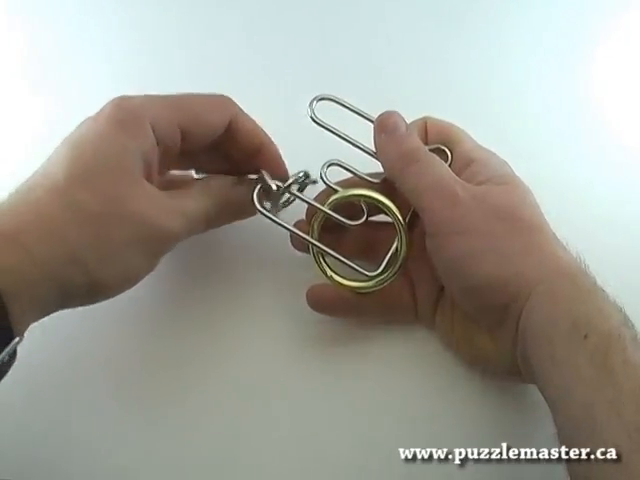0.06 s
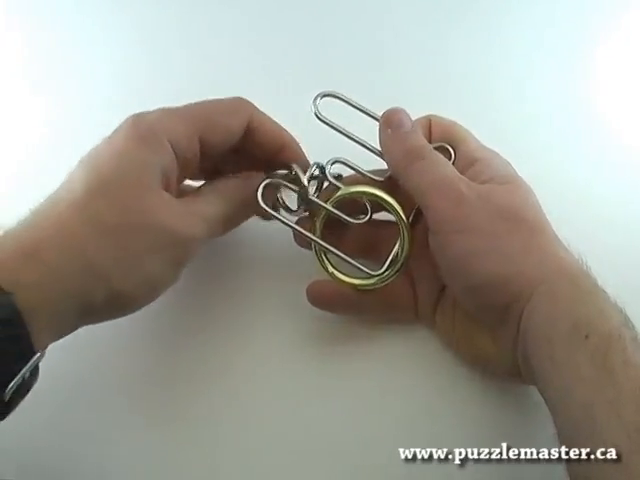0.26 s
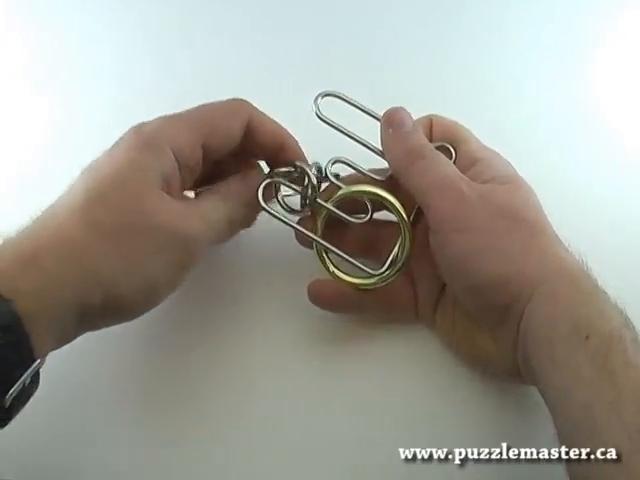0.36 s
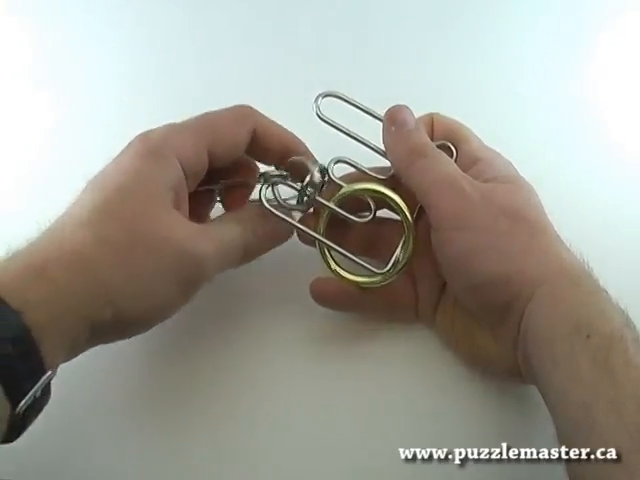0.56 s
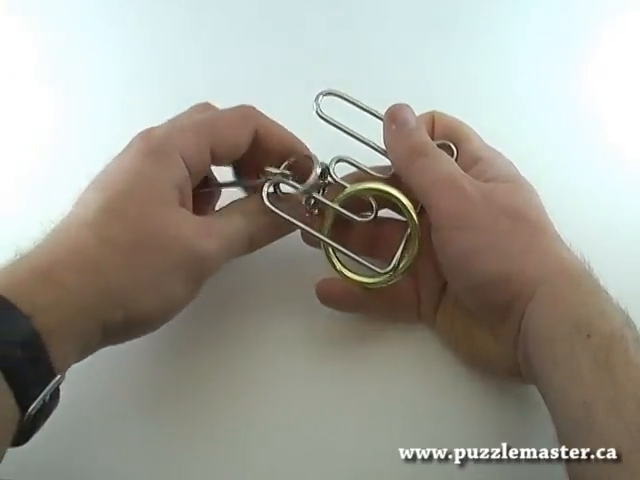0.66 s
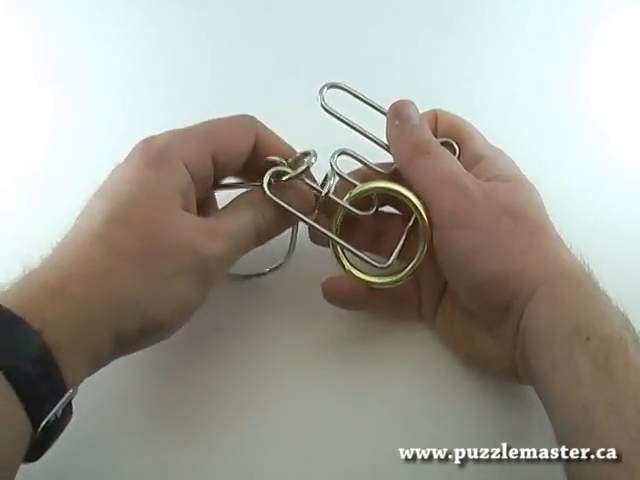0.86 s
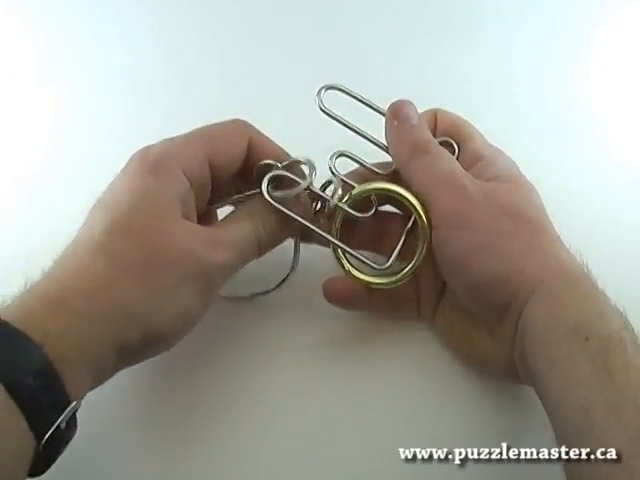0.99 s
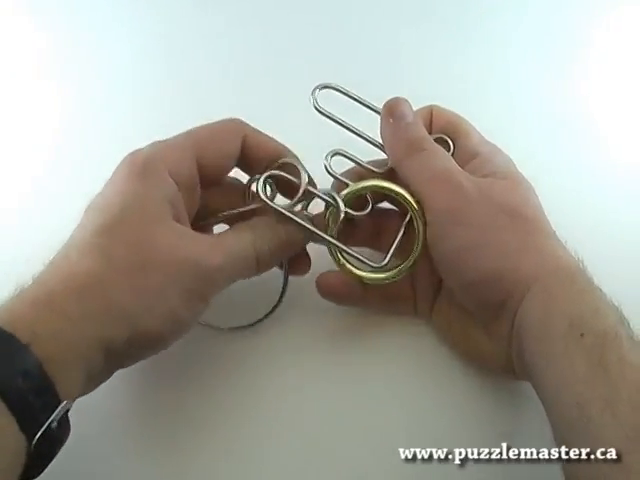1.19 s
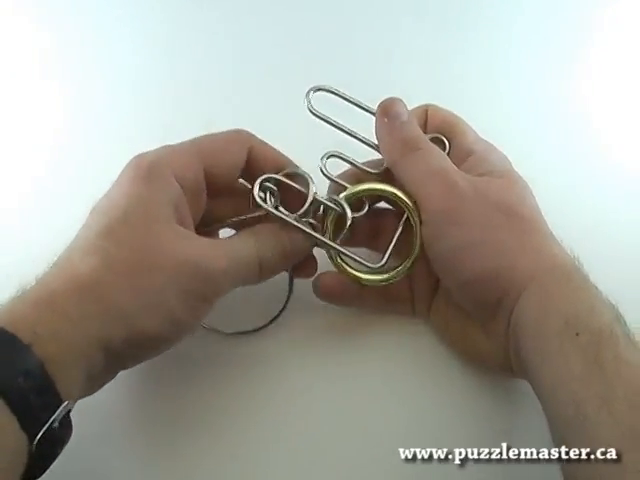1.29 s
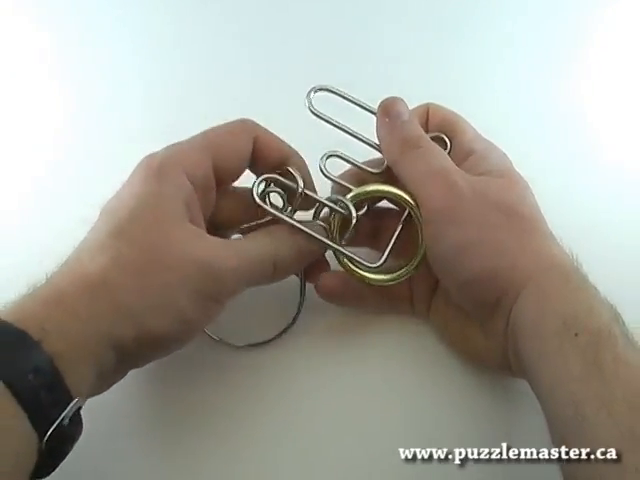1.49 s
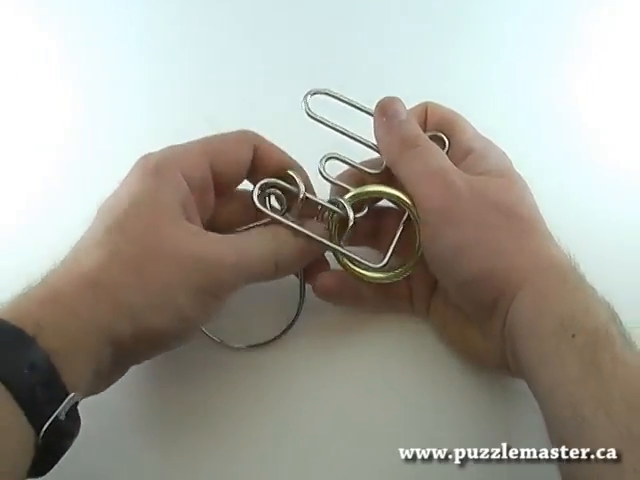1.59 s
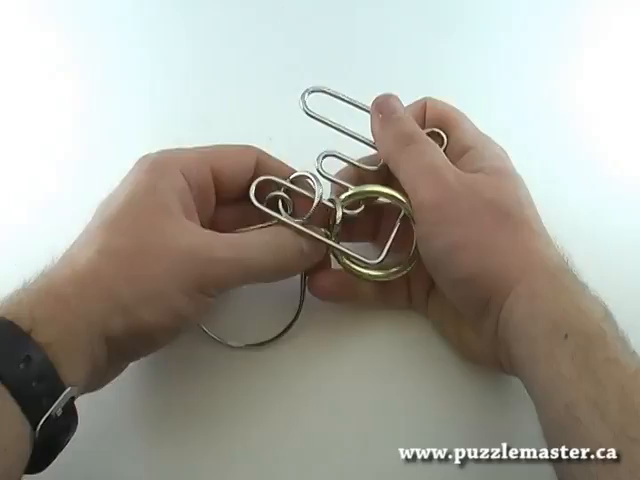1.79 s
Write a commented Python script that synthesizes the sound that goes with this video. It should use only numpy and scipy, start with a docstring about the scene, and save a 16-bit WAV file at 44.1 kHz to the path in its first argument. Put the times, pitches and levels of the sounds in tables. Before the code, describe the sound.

Steel wire puzzle pieces clink in two hands, close and bright, with short choked rings. Light clinks scatter from 0 to 0.4 s; the sharpest burst comes at 0.52 s with a soft low knock, more hits follow to 0.73 s. A faint scrape near 0.9 s leads to a chattering cluster at 1.1-1.35 s, then weaker clinks around 1.54 s and sparse faint taps. Quiet room hiss and hum continue.

```python
"""Bright metal clinks and chatters in a quiet, humming room: two hands work a steel wire puzzle.
Each clink is a sharp snap, a grainy rattle of small hits and a ring of decaying sine waves.
Ticks are short clicks of noise; thumps are low decaying sine waves in the table, under a dull click.
Wire sliding on wire is grainy noise with a low drag. Filtered noise and hum fill the background."""
import sys
import numpy as np
from scipy import signal
from scipy.fft import rfft, irfft
from scipy.io import wavfile
from scipy.ndimage import uniform_filter1d

SR = 44100
rng = np.random.default_rng(int(sys.argv[2]) if len(sys.argv) > 2 else 0)


def to_wav(s):
    """Save 16-bit WAV."""
    ch = np.atleast_2d(s).T  # columns
    pcm = np.round(np.clip(ch, -1, 1) * 32767)  # PCM
    wavfile.write(sys.argv[1], SR, pcm.astype(np.int16))


N = 81585  # length of the scene in samples

# Low resonances of the table: f/Hz, width/Hz (wider dies faster), level/dB against each other
TABLE_MODES = [(195, 39, -2), (238, 28.5, -8), (332.5, 49, -4), (396.7, 49, -1.5), (1019, 28, -9.5),
               (1378, 110, -9.5), (1714, 173, -5.5)]


def amp(db):
    """Turns decibels into a plain multiplier."""
    return 10 ** (np.asarray(db) / 20)


def evened(x):
    """Scales x to an rms of 1."""
    return x / np.sqrt(np.mean(x ** 2) + 1e-20)


def read(points, hz):
    """Reads a curve of (f/Hz, value) points, joined by straight lines over log frequency."""
    f, value = np.transpose(points)
    return np.interp(np.log(hz + 1), np.log(f + 1), value)


def add(mix, s, sound):
    """Adds a sound to the mix from second s on, cut off where the mix ends."""
    part = mix[:, round(s * SR):][:, :sound.shape[-1]]
    part += sound[..., :part.shape[1]]


def coloured(x, points, tilt_db=0., pivot_hz=9000, from_hz=4500):
    """Gives x a spectrum, tilted in dB per octave about a pivot; the tilt stays level below from_hz."""
    hz = np.fft.rfftfreq(x.shape[-1], 1 / SR)
    octaves = np.log2(np.maximum(hz, from_hz) / pivot_hz)
    return irfft(rfft(x) * amp(read(points, hz) + tilt_db * octaves), x.shape[-1])


def whistle(hz, width):
    """Noise in one narrow resonance, rms 1: it sounds like a wavering tone."""
    r = np.exp(-np.pi * width / SR)
    turn = np.exp(2j * np.pi * hz * np.arange(N) / SR)
    slow = signal.lfilter([1], [1, -r], rng.standard_normal(N) / turn)
    return evened((turn * slow).real)


def level(curve):
    """Turns (t/s, level/dB) points into a volume curve, practically silent outside them."""
    s, db = np.transpose(curve)
    return amp(np.interp(np.arange(N) / SR, s, db, -140, -140))


def wire_ring(t, hz, mode_db, near, t60, tilt_db, chatter, free_s):
    """The wire's modes ring as decaying sines; the two favoured pitches are strongest and last longest."""
    focus_db, scatter_db, flutter_db, detune = 20, 2.5, 1, 0.0012
    early_db, early_s = 9.5, 0.0042  # the ring starts louder until the fingers close
    choke_db_per_s, escapes = 782.5, 0.65  # share of the choke that the favoured modes escape
    others_last = 0.6  # share of t60 that modes far from the favoured pitches last
    luck = rng.standard_normal((3, len(hz), 1))
    start_db = mode_db + focus_db * near + scatter_db * luck[1] + tilt_db * np.log2(hz / 9000)
    lasts = t60 * (others_last + (1 - others_last) * near)
    turns = hz * (1 + detune * luck[0]) * t + luck[2]
    flutter = evened(uniform_filter1d(rng.standard_normal((len(hz), len(t))), 150))
    mode_level = start_db + flutter_db * flutter + early_db * np.exp(-t / early_s) - 60 * t / lasts
    choke = choke_db_per_s * (1 - escapes * near) * np.maximum(t - free_s, 0)
    ring = (amp(mode_level - choke) * np.sin(2 * np.pi * turns)).sum(0)
    ring *= 1 - np.exp(-t / (0.47 * chatter))  # longer chatter gives a softer start
    return ring / np.std(ring[:300])


def wire_rattle(t, hz, mode_db, near, t60, tilt_db, chatter, free_s):
    """Many small hits each start a grain of noise, tuned to the wire and partly different left and right."""
    # Spectrum of one grain before tuning: f/Hz, relative level/dB
    crack = [(900, -55), (2000, -32), (3200, -23), (4000, -29.5), (4700, -17.5), (6200, -6.5), (7400, -9.5),
             (8200, -4.5), (11500, -1), (14700, -9), (16500, -7)]
    # Strength of the left-right difference: f/Hz, share of the common noise
    wide = [(3000, 0.036), (8000, 0.11), (13000, 0.75)]
    contacts_per_s, first_contact, shorter = 1100, 1.55, 0.71  # shorter: share of the ring's t60
    tuned_db, tuned_width_hz, grain_t60, choke_db_per_s = -0.5, 55, 0.034, 782.5
    sizes = rng.uniform(-1, 1, len(t))
    hits = sizes * (rng.random(len(t)) < contacts_per_s / SR)
    hits[0] = first_contact
    fade_db = -60 * np.maximum(t - chatter, 0) / (t60 * shorter)
    hits *= amp(fade_db - choke_db_per_s * np.maximum(t - free_s, 0))
    noise = coloured(rng.standard_normal((2, 2048)), crack, tilt_db)
    bins = np.fft.rfftfreq(2048, 1 / SR)
    tuned = amp(tuned_db + mode_db + 0.17 * 20 * near) / (1 + ((bins - hz) / tuned_width_hz) ** 2)
    noise = irfft(rfft(noise) * (1 + tuned.sum(0)) * np.array([bins ** 0, read(wide, bins)]))
    grain = noise * amp(-60 * t[:2048] / grain_t60) * np.minimum(t[:2048] / 0.00034, 1)
    both, apart = signal.fftconvolve(grain, hits[None], axes=1)[:, :len(t)]
    return (both + np.array([[1], [-1]]) * apart) / np.sqrt(np.mean(both[:300] ** 2))


def clink(s, db, low_hz, high_hz, t60, tilt_db, chatter, rattle_db, free_s):
    """A contact snaps, rattles and rings the wire; the next contact, free_s later, chokes ring and rattle."""
    # Resonances of the wire: f/Hz, level/dB against each other
    wire = [(5040, -11.5), (6070, -21.5), (6290, -5.5), (6500, -8), (7040, -11.5), (7950, -7.5),
            (8370, -6.5), (8800, -14.5), (9740, -3.5), (10250, -13.5), (10620, -12), (10900, -10),
            (11210, -1.5), (11380, -0.5), (11960, -5.5), (12600, 0), (13000, 0.5), (14260, -8)]
    clink_db, focus_octaves, snap_db, snap_t60 = -14.5, 0.065, 9.5, 0.003
    t, t60 = np.arange(6000) / SR, max(t60, .01)
    hz, mode_db = np.transpose(wire)[:, :, None]
    # 1 for modes at the two favoured pitches, falling to 0 away from them
    near = sum(np.exp(-.5 * (np.log2(hz / f) / focus_octaves) ** 2) for f in (low_hz, high_hz)).clip(0, 1)
    contact = (t, hz, mode_db, near, t60, tilt_db, chatter, free_s)
    ring = wire_ring(*contact)
    rattle = wire_rattle(*contact)
    snap_band = signal.butter(3, [5500, 13500], "band", fs=SR, output="sos")
    crackle = rng.choice([-1., 1.], len(t)) * amp(snap_db - 60 * t / snap_t60)
    snap = signal.sosfilt(snap_band, crackle)
    return s, amp(db + clink_db) * (ring + amp(rattle_db) * rattle + snap)


def tick(s, db, tilt_db):
    """A damped wire taps without ringing: a short burst of noise over a wide range of pitches."""
    t = np.arange(2048) / SR
    colour = [(300, -31), (1000, -5.0), (9000, 9), (15000, -5)]  # f/Hz, relative level/dB
    noise = coloured(rng.standard_normal(len(t)), colour, tilt_db, 3000, 960)
    return s, amp(db - 6.5 - 60 * t / 0.019) * evened(noise) * np.minimum(t / 0.0012, 1)


def thump(s, db, t60, tilt_db, focus_hz):
    """A knock reaches the table, whose low modes swell in a few ms and die away, under a dull click."""
    scatter_db, focus_db, detune = 2, 9.5, 0.064
    t = np.arange(8000) / SR
    hz, width, mode_db = np.transpose(TABLE_MODES)[:, :, None]
    start_db = mode_db + tilt_db * np.log2(hz / 300) + scatter_db * rng.standard_normal(hz.shape)
    start_db = start_db + focus_db * np.exp(-.5 * (np.log2(hz / focus_hz) / 0.24) ** 2)
    fade = amp(start_db - 60 * t * (.5 / t60 + 0.28 * width / 2.37))
    fade = fade * (1 - np.exp(-t * hz / 1.62))  # higher modes swell sooner
    mode_hz = hz * (1 + detune * rng.uniform(-0.84, 1, hz.shape))
    ring = (fade * np.sin(2 * np.pi * mode_hz * t)).sum(0)
    # f/Hz, relative level/dB
    colour = [(60, -21), (200, -3.5), (500, -7.5), (2000, -6), (4000, -11), (9000, -33)]
    click = evened(coloured(rng.standard_normal(len(t)), colour, tilt_db, 300, 150))
    click *= amp(-3.0 - 60 * t / (1.34 * t60))
    return s, amp(db - 13.5) * (ring + click)


def slides():
    """Wire rubs on wire: noise of uneven loudness makes a grainy hiss, with a low drag in the table."""
    # Loudness of each rub, one list per rub: t/s, level/dB
    rubs = [
        [(.84, -77), (.87, -60), (.9, -61), (.925, -56), (.947, -62.5)],
        [(1.49, -74), (1.512, -56.5), (1.524, -65.5), (1.54, -63), (1.546, -42.5)],
        [(.505, -71), (.515, -55), (.522, -42)],
    ]
    # Spectrum of the hiss: f/Hz, relative level/dB
    hiss_colour = [(470, -25), (1440, -5.5), (2840, -23), (4080, -5.5), (4510, -4.5), (7080, -1.5),
                   (10600, -7), (16000, -23)]
    # Loudness of the drag felt in the table: t/s, level/dB
    drag_level = [(.78, -78), (.82, -66.5), (.87, -56.5), (.91, -61), (.96, -70)]
    noise = rng.standard_normal(N)
    uneven_db = evened(uniform_filter1d(rng.standard_normal(N), 60))
    hiss = evened(coloured(noise * amp(uneven_db), hiss_colour)) * sum(level(rub) for rub in rubs)
    drag = evened(sum(amp(db) * whistle(hz, width) for hz, width, db in TABLE_MODES))
    return hiss + drag * level(drag_level)


def ports(x):
    """Two close microphone ports hear small differences in phase and balance, which vary with pitch."""
    # Phase by which the left leads: f/Hz, lead/rad
    lead = [(0, 0.82), (10200, -0.14), (12700, 1), (14800, 0.48)]
    # Balance, left against right: f/Hz, level/dB
    lean = [(3000, -1.4), (8000, 0.5), (13000, 1.5)]
    hz = np.fft.rfftfreq(N, 1 / SR)
    half = amp(.5 * read(lean, hz)) * np.exp(.5j * read(lead, hz))
    return irfft(rfft(x) * np.array([half, 1 / half]), N)


def room(x):
    """Short sparse reflections from table and hands, different in each channel."""
    room_t60 = 0.27  # seconds to fall by 60 dB; the reflections stop before that
    t = np.arange(5000) / SR
    signs = rng.choice([-1., 1.], (2, len(t)))
    taps = signs * (rng.random((2, len(t))) < .05) * amp(-60 * t / room_t60)
    taps = taps / np.linalg.norm(taps, axis=1)[:, None]
    return signal.fftconvolve(x, taps, axes=1)[:, :N]


def air():
    """Room and preamp noise, partly shared by the channels, with wavering hum lines and one steady hum."""
    # Spectrum of the noise: f/Hz, relative level/dB
    air_colour = [(12, -53), (20, -2.5), (258, -2.5), (566, -6.5), (749, -4.5), (1690, -8.5), (1840, -13),
                  (2300, -10), (3710, -17), (5660, -12), (6890, -12.5), (10500, -15), (14700, -18),
                  (16500, -29)]
    # Left-right likeness of the noise: f/Hz, likeness (1 = identical, 0 = unrelated)
    air_same = [(40, 0.71), (240, 0.61), (700, 0.61), (3770, 0.69), (15000, 0.073)]
    # Wavering hum lines: f/Hz, width/Hz, level/dB
    hum_lines = [(121.6, 17, -74), (236.5, 5.5, -75), (2272, 8.3, -80.5), (747, 41, -78)]
    air_db, steady_hz, steady_db = -64.5, 242.3, -71
    hz = np.fft.rfftfreq(N, 1 / SR)
    a, b = rfft(rng.standard_normal((2, N)))
    same = read(air_same, hz)
    pair = np.array([a, same * a + np.sqrt(1 - same ** 2) * b])
    wash = irfft(pair * amp(read(air_colour, hz)), N)
    wavering = sum(amp(db) * whistle(f, width) for f, width, db in hum_lines)
    steady = amp(steady_db) * np.sin(2 * np.pi * steady_hz * np.arange(N) / SR)
    return amp(air_db) * evened(wash) + wavering + steady


def scene():
    """Places every clink, tick and thump, then adds the reflections, slides and background."""
    # Wire contacts: t/s, level/dB (before a common trim), low favoured f/Hz, high favoured f/Hz,
    # ring t60/s when not choked, tilt/(dB per octave), chatter/s, rattle level against ring/dB
    clinks = sorted([(0.0374, -37.5, 9190, 12800, 0.12, -27, 0.023, 1),
                     (0.0483, -25, 5330, 10110, 0.023, -1, 0.014, -4),
                     (0.0902, -43.5, 7950, 9000, 0.06, -11, 0.0087, -1.5),
                     (0.1496, -26.5, 8300, 11100, 0.04, -5.5, 0.0074, 3),
                     (0.2044, -29, 5830, 14100, 0.24, -8, 0.0082, 6.5),
                     (0.3227, -28.5, 9000, 10500, 0.048, -1.5, 0.0012, 7.5),
                     (0.5284, -16.5, 8200, 11030, 0.23, -1, 0.016, 2),
                     (0.5414, -25, 8300, 14260, 0.096, 2, 0.0047, -23),
                     (0.5624, -25.5, 9120, 11400, 0.25, -2.5, 0.0026, 7),
                     (0.5744, -26, 8650, 14300, 0.038, 13, 0.0071, 4),
                     (0.5874, -33, 5950, 9900, 0.054, -11, 0.0026, 5.5),
                     (0.6024, -36, 6180, 10800, 0.031, 3, 0.0029, 4),
                     (0.6814, -19.5, 8210, 12800, 0.056, 0.5, 0.002, 1.5),
                     (0.7282, -35.5, 6060, 11420, 0.052, -6.5, 0.0016, 0),
                     (0.9158, -46, 7900, 10600, 0.06, -11, 0.0025, 5),
                     (1.1009, -25.5, 7000, 10800, 0.026, -3.5, 0.002, 3.5),
                     (1.1574, -29, 6100, 7840, 0.069, -17, 0.0029, -3),
                     (1.1844, -43, 8300, 10600, 0.053, -11, 0.0034, 1),
                     (1.2004, -42.5, 6200, 9750, 0.03, -20, 0.003, -6),
                     (1.2241, -46, 6140, 10200, 0.051, -15, 0.0054, 1.5),
                     (1.3947, -38.5, 8530, 13000, 0.091, -9, 0.0016, 6),
                     (1.5244, -35, 6400, 9400, 0.1, -2, 0.0039, 3),
                     (1.5419, -24, 8000, 11100, 0.028, -1.5, 0.0017, 7),
                     (1.5584, -39, 8120, 11800, 0.035, -3, 0.0032, 8),
                     (1.5764, -42.5, 8700, 10000, 0.022, -7, 0.0023, 9.5),
                     (1.6407, -38, 7100, 14260, 0.027, -2.5, 0.0044, 1.5),
                     (1.715, -46, 8800, 9350, 0.032, -21, 0.0038, -2),
                     (1.7943, -41.5, 7020, 10900, 0.0097, -16.5, 0.00082, 9),
                     (1.139, -25.5, 6200, 11300, 0.097, 6, 0.012, -12),
                     (1.2815, -32, 11380, 14260, 0.11, 5, 0.003, -12),
                     (.0064, -27.5, 6570, 9740, 0.1, 6.5, 0.00065, 6),
                     (.2095, -22, 6140, 13940, 0.051, 13, 0.0014, -1),
                     (.2458, -27.5, 6500, 12900, 0.061, -0.5, 0.0026, 0),
                     (.2658, -38.5, 6240, 9740, 0.062, -7, 0.0039, 7),
                     (.2808, -36.5, 6500, 11000, 0.042, -4, 0.0024, 11),
                     (.2895, -40, 6290, 11300, 0.21, -9.5, .003, 5),
                     (.4155, -20, 7950, 11400, 0.051, -3.5, 0.0069, 1),
                     (.5221, -10, 10270, 14680, 0.12, -3, 0.0015, 2),
                     (.6361, -14.5, 7950, 11250, 0.1, -1.5, 0.002, -3),
                     (.6699, -17, 8140, 11350, 0.13, -7.5, 0.0041, -8.5),
                     (1.1318, -14, 6200, 7980, 0.038, 1.5, 0.025, -4),
                     (1.1481, -16.5, 9600, 11800, 0.093, -4, 0.001, -2),
                     (1.2776, -23, 6180, 12100, 0.045, -3.5, 0.004, 4.5),
                     (1.3124, -44, 5750, 10200, 0.41, -25, 0.0082, 0),
                     (1.3329, -21, 6250, 10740, 0.052, 0, 0.0049, 6)])
    # Dry taps: t/s, level/dB (before a common trim), tilt/(dB per octave)
    ticks = [(1.4219, -40.5, -5.5), (1.724, -41, -5)]
    # Table knocks: t/s, level/dB (before a common trim), fading time/s (before scaling),
    # tilt/(dB per octave), most excited f/Hz
    thumps = [(0.004, -37.5, 0.3, -4.5, 260), (0.201, -43.5, 1, -2.9, 370), (0.321, -45, 0.049, 5, 1260),
              (0.518, -32.5, 0.2, -1.7, 191), (0.563, -33.5, 0.15, -1.5, 390), (0.588, -41, 0.12, 6, 307),
              (0.637, -40.5, 0.18, 0.5, 990), (0.686, -38.5, 0.095, -2, 388), (1.419, -45, 0.06, 1, 920)]
    room_db = -26
    metal, table = np.zeros((2, N)), np.zeros((2, N))
    next_starts = [row[0] for row in clinks[1:]] + [N / SR]
    for row, next_start in zip(clinks, next_starts):
        add(metal, *clink(*row, next_start - row[0]))
    for row in ticks:
        add(metal, *tick(*row))
    for row in thumps:
        add(table, *thump(*row))
    return ports(metal) + amp(room_db) * room(metal) + table + slides() + air()


def record(dry):
    """The highest treble droops gently, then a steep low-pass filter removes what lies above its edge."""
    droop_hz, edge_hz = 15750, 16600
    droop = signal.oaconvolve(dry, signal.firwin(101, droop_hz, fs=SR)[None], "same")
    edge = signal.firwin(511, edge_hz, window=("kaiser", 9), fs=SR)
    return signal.oaconvolve(droop, edge[None], "same")


dry = scene()
out = record(dry)
to_wav(out)
```